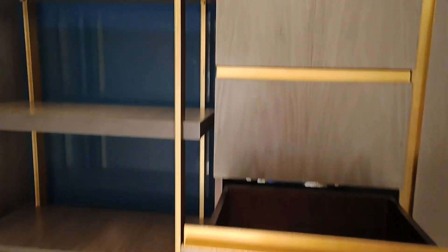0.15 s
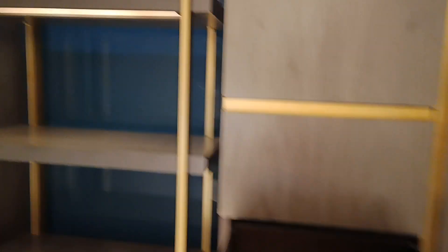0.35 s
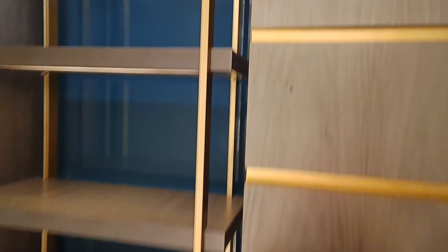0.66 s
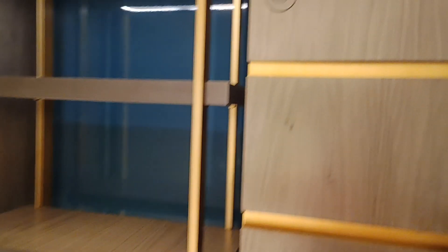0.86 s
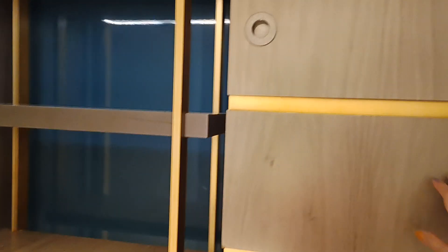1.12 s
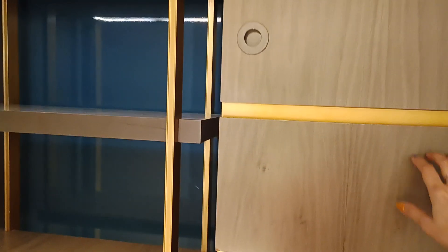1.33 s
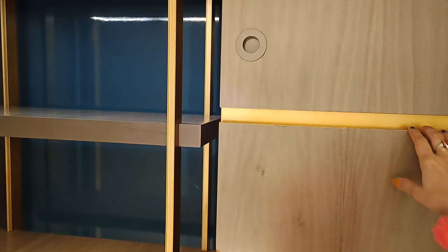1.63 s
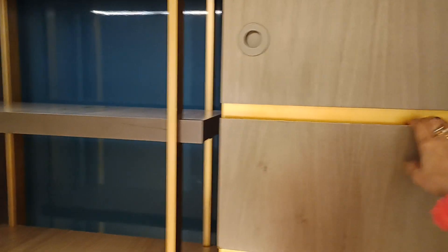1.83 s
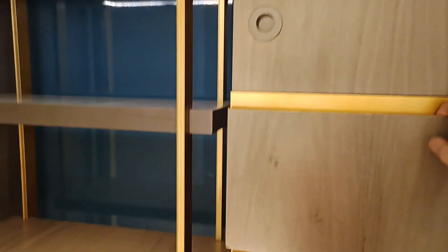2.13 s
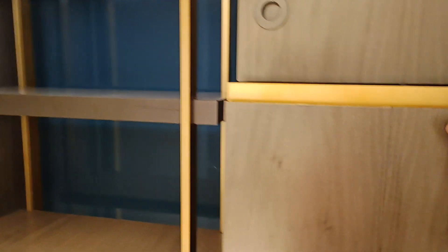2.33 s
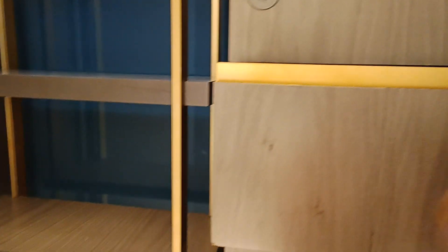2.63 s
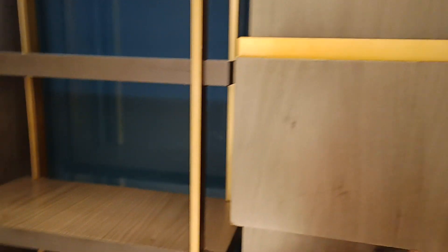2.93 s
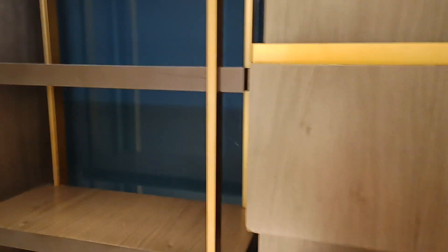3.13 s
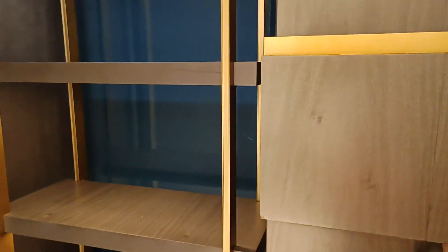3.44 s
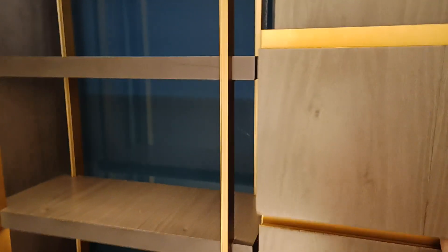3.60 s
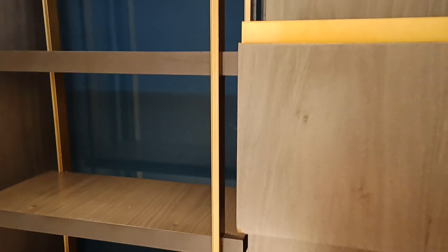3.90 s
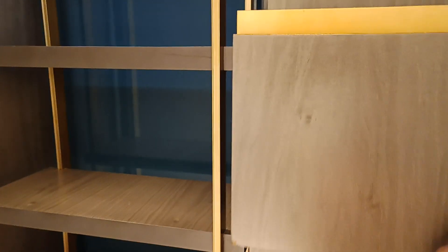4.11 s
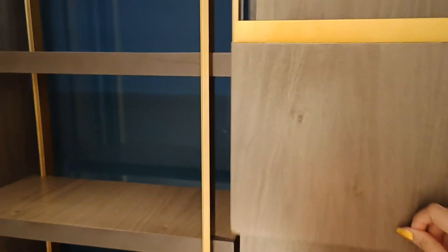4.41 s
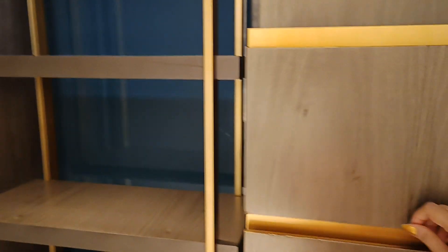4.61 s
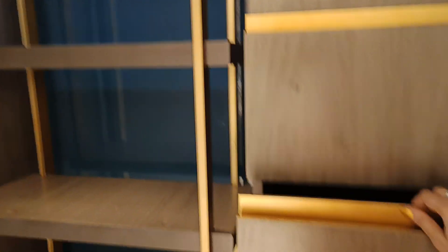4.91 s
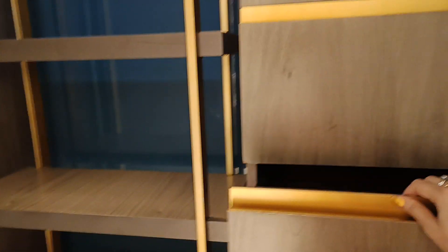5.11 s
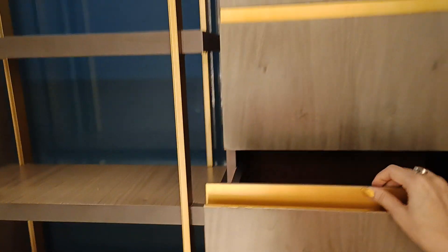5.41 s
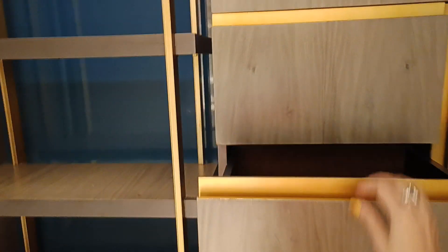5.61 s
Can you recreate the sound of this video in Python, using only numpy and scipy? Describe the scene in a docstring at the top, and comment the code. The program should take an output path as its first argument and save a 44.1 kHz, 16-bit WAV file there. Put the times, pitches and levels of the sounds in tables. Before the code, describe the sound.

Close stereo pickup in a small quiet room. After faint taps and rustle, a wooden drawer is shoved with a low buzzing judder. Light clicks follow, then a second drawer rumbles out, knocks softly and eases back until its metal catch snaps sharply. A third rolls out and hits its end stop with a deep, heavy wooden thud, leaving low rumble.

```python
"""Wooden drawers on metal runners in a small quiet room, heard from close by.
One is shoved shut with a judder; the next is pulled out and eased back until its catch snaps;
a third rolls out and thuds against its end stop. Knocks, soft low thumps, clicks and light taps are
decaying modes and noise bursts; drawer strokes, a soft rustle at the start and low rumble after the
stop are shaped noise; a slip train makes the judder. Diffuse echo and faint air lie around them."""
import sys
import numpy as np
from scipy import signal
from scipy.fft import rfft, irfft, next_fast_len
from scipy.io import wavfile

SR = 44100
rng = np.random.default_rng(int(sys.argv[2]) if len(sys.argv) > 2 else 0)


def to_wav(sig):
    """Store sig (one row per channel, or 1-D mono) as 16-bit WAV at the path in sys.argv[1].

    Samples outside -1..1 are clipped; the rate is SR.
    """
    pcm = np.clip(np.atleast_2d(sig), -1, 1) * 32767
    pcm = np.round(pcm).astype(np.int16)
    wavfile.write(sys.argv[1], SR, pcm.T)  # frames by channels


N = 253575
TIME = np.arange(N) / SR
AGE = TIME[:SR * 2 // 3]  # time since a blow [s]

# cabinet modes: (frequency [Hz], relative level [dB], t60 [s])
CABINET_MODES = [(59, 8.5, 0.35), (80.1, 6.5, 0.52), (110.8, 8, 0.22), (152.2, 8, 0.58), (171.2, 5, 0.41)]
# drawer box modes: (frequency [Hz], relative level [dB], t60 [s])
BOX_MODES = [(218.5, -5, 0.26), (248.4, -2, 0.31), (296.8, -6.5, 0.2), (331.5, 1, 0.24),
             (367.6, -6.5, 0.36), (404.4, 5.5, 0.036), (436.8, -19, 0.78)]
# thin side panels and drawer bottom: (frequency [Hz], relative level [dB], t60 [s])
PANEL_MODES = [(521, -4.5, 0.34), (604, -6, 0.74), (697.4, 3.5, 0.23), (768.5, 4.5, 0.18), (882, -2, 0.37),
               (1013, 4.5, 0.1), (1107, 3.5, 0.2), (1191, 9, 0.13), (1390, 4, 0.076), (1460, -9, 0.067),
               (1500, 3.5, 0.073), (1880, 16, 0.035)]
# steel runner modes: (frequency [Hz], relative level [dB], t60 [s])
RUNNER_MODES = [(1356, 6.5, 0.16), (1982, 13, 0.14), (1940, -17, 0.085), (2010, -28, 0.13),
                (2178, 8.5, 0.12), (2270, 26, 0.14), (2400, -27, 0.32), (2583, 5, 0.1), (2500, 5, 0.2),
                (2700, -7, .15), (3500, -2, 0.34), (3850, 5.5, 0.06)]
# dense cabinet boom: (frequency [Hz], relative level [dB/Hz])
BOOM_SPECTRUM = [(25, -48), (42, 0), (58, -29), (80, 7.5), (160, 0.5), (210, 5), (400, -61)]
# dense drawer box vibration: (frequency [Hz], relative level [dB/Hz])
BODY_SPECTRUM = [(120, -21), (220, -17.5), (350, 4.5), (440, 8), (540, -11.5), (900, -15), (2000, -70)]
# clack of edges and panels: (frequency [Hz], relative level [dB/Hz])
CLACK_SPECTRUM = [(300, -11), (550, -2), (720, -8), (950, -2.5), (1300, 0.5), (2100, -4), (3200, -14),
                  (7000, -32)]
# treble tick of a contact: (frequency [Hz], relative level [dB/Hz])
TICK_SPECTRUM = [(1200, -20), (2500, -3), (3800, 3), (5200, -2), (7000, -3.5), (10000, -13.5),
                 (16000, -12.5)]


def amp(db):
    """Decibels to gain."""
    return np.exp(np.asarray(db) * (np.log(10) / 20))


def read(points, hz):
    """Interpolates a spectrum table on a log-frequency axis."""
    table_hz, value = np.transpose(points)
    return np.interp(np.log(hz + 1), np.log(table_hz), value)


def add(mix, time_s, sound):
    """Mixes a sound in at time_s, cut at the end of the mix."""
    part = mix[:, round(time_s * SR):][:, :sound.shape[-1]]
    part += sound[..., :part.shape[1]]


def taps(points, size=8192):
    """Minimum-phase impulse response with the given spectrum."""
    hz = abs(np.fft.fftfreq(size, 1 / SR))
    log_gain = np.log(amp(read(points, hz)))
    spectrum = np.exp(np.conj(signal.hilbert(log_gain)))
    return np.fft.ifft(spectrum).real[:size // 2]


def colour(x, points):
    """Gives white sound a spectrum and keeps its power."""
    h = taps(points)
    return signal.oaconvolve(x, h[None] / np.linalg.norm(h), axes=1)[:, :N]


def blow(x):
    """Scales a struck sound to rms 1 over its first 40 ms."""
    return x / np.sqrt(np.mean(x[..., :SR // 25] ** 2) + 1e-20)


def grit(size, spread_db):
    """Two channels of noise whose shared strength changes every few milliseconds."""
    step = 128  # samples
    knots = rng.standard_normal(size // step + 2)
    level_db = spread_db * np.interp(np.arange(size) / step, np.arange(len(knots)), knots)
    strength = amp(level_db)
    return rng.standard_normal((2, size)) * strength / np.sqrt(np.mean(strength ** 2))


def onset(contact_s):
    """Force builds up over the contact time."""
    return 1 - np.exp(-(AGE / contact_s) ** 2)


def burst(contact_s, t60_s, chatter_db):
    """Countless close modes, as noise, that die away together with a little chatter."""
    return blow(grit(len(AGE), chatter_db) * onset(contact_s) * amp(-60 * AGE / t60_s))


def ring(modes, contact_s):
    """Decaying sines; each place of impact weights the modes a little differently."""
    place_db = rng.standard_normal(len(modes))
    total = np.zeros(len(AGE))
    for k, (hz, db, t60_s) in enumerate(modes):
        decay = amp(db + place_db[k] - 60 * AGE / t60_s)
        total += (-1) ** k * decay * np.sin(2 * np.pi * hz * AGE)
    return blow(total * onset(contact_s))


def shake(force, modes):
    """A running force keeps a set of modes ringing."""
    h = ring(modes, contact_s=0.0021)
    return signal.oaconvolve(force, h[None] / np.linalg.norm(h), axes=1)[:, :N]


def swell(start_s, rise_s, length_s, t60_s):
    """Envelope that builds up, holds until length_s after its start, and dies away."""
    age = np.maximum(TIME - start_s, 0)
    return (1 - np.exp(-(age / rise_s) ** 2)) * amp(-60 * np.maximum(age - length_s, 0) / t60_s)


def air(hiss_db=-55.5, drift_db=-2.0, throb_db=-60, throb_spread_db=3):
    """Faint drifting noise over a low throb: the lowest cabinet mode driven by noise."""
    # room air: (frequency [Hz], relative level [dB/Hz])
    air_spectrum = [(20, -5), (35, 2), (58, 2.5), (85, 6), (160, -4.5), (350, -5), (650, -9), (1400, -15),
                    (2600, -16.5), (6500, -25), (10000, -31.5), (16000, -25)]

    def wander(count):
        return np.interp(TIME, np.linspace(0, TIME[-1], count), rng.standard_normal(count))

    hiss_gain = amp(hiss_db + drift_db * wander(count=30))
    hiss = hiss_gain * colour(rng.standard_normal((2, N)), air_spectrum)
    throb_gain = amp(throb_db + throb_spread_db * wander(count=40))
    return hiss + throb_gain * shake(rng.standard_normal((2, N)), CABINET_MODES[:1])


def fitting_taps():
    """Light taps ring the modes of a small hard fitting."""
    # taps: (time [s], level [dB])
    tap_events = [(0.021, -66), (0.049, -54), (0.732, -59), (0.978, -65), (1.31, -67)]
    # fitting: (frequency [Hz], relative level [dB], t60 [s])
    fitting_modes = [(1485, -6.5, 0.055), (2410, -13, 0.04), (2580, 5.5, 0.019), (3490, 0, 0.018),
                     (4020, -10, 0.044)]
    mix = np.zeros((2, N))
    for time_s, db in tap_events:
        add(mix, time_s, amp(db) * ring(fitting_modes, contact_s=0.00029))
    return mix


def clicks(runner_db=-8.0, panels_db=-5, clack_dense_db=-3, snap=30.0, sharp_s=0.0012, lead_s=0.00042):
    """Steel snaps and rings runners and panels; crack and tones start first on the right."""
    # runner and catch metal, levels before the trims above:
    # (time [s], contact [s], clack [dB], ring [dB], tick [dB], noise t60 [s])
    click_events = [(.049, 0.0003, -80, -77, -62.5, 0.022), (0.978, 0.00036, -58.5, -59, -54.5, 0.069),
                    (0.994, 0.00032, -62, -83, -54.5, 0.039), (1.309, 0.0006, -61, -55, -82, 0.15),
                    (1.95, 0.0017, -50, -59, -54.5, 0.39), (1.972, 0.0017, -48.5, -48, -67, 0.12),
                    (2.319, 0.00033, -43.5, -51.5, -46, 0.14), (2.481, 0.00083, -57, -68, -56, 0.53),
                    (2.855, 0.00048, -62.5, -68, -57.5, 0.15), (3.494, 0.00083, -46.5, -49.5, -51.5, 0.17),
                    (3.6299, 0.00042, -31, -25.5, -35, 0.087), (3.6338, 0.00056, -32, -63, -47, 0.012),
                    (3.872, 0.0039, -46, -55.5, -77, 0.15), (3.921, 0.0015, -48.5, -65, -58, 0.11),
                    (4.028, 0.0013, -64, -60, -53.5, 0.19), (4.294, 0.0029, -64, -73, -55.5, 0.032),
                    (4.767, 0.0022, -46, -49, -52.5, 0.21), (4.835, 0.0006, -38, -43, -42, 0.11),
                    (4.939, 0.00055, -53, -52.5, -54, 0.041), (5.059, 0.0026, -50.5, -69, -54.5, 0.26),
                    (5.134, 0.0098, -50.5, -61, -58, 0.26), (5.554, 0.0014, -55, -64, -57.5, 0.48)]
    # dense steel ring: (frequency [Hz], relative level [dB/Hz])
    steel_spectrum = [(900, -20), (1600, -4), (2050, 1.5), (2500, -2), (3000, -8), (3600, -12.5),
                      (7000, -37)]
    modes, clack, steel, tick = np.zeros((4, 2, N))
    lag = round(lead_s * SR)
    for time_s, contact_s, clack_db, ring_db, tick_db, t60_s in click_events:
        strike = burst(contact_s, t60_s, chatter_db=3.0)
        rattle = burst(contact_s, t60_s, chatter_db=2.5)
        crack = np.zeros_like(strike)
        crack[[0, 1], [lag, 0]] = snap * np.exp(-contact_s / sharp_s)  # weak for a soft contact
        add(clack, time_s, amp(clack_db + clack_dense_db) * burst(contact_s, t60_s, chatter_db=9))
        add(steel, time_s, amp(ring_db) * blow(strike + crack))
        add(tick, time_s, amp(tick_db) * blow(rattle + crack))
        runner_tone = amp(ring_db + runner_db) * ring(RUNNER_MODES, contact_s)
        panel_tone = amp(clack_db + panels_db) * ring(PANEL_MODES, contact_s)
        tone = runner_tone + panel_tone
        add(modes, time_s, np.array([np.roll(tone, lag), tone]))
    dense = colour(clack, CLACK_SPECTRUM) + colour(steel, steel_spectrum)
    return modes + dense + colour(tick, TICK_SPECTRUM)


def nails():
    """Tiny hard contacts, as of fingernails: noise bursts mostly in the high treble."""
    # ticks: (time [s], level [dB], t60 [s])
    nail_events = [(0.049, -59, 0.0078), (0.925, -67, 0.028), (0.942, -65, 0.036), (0.976, -60, .03),
                   (.993, -56, 0.1), (1.069, -62, 0.083), (1.105, -65, 0.046), (1.309, -62, .2),
                   (3.25, -58, 0.11), (4.180, -69, 0.022), (4.294, -54, 0.12)]
    # bright tick: (frequency [Hz], relative level [dB/Hz])
    bright_spectrum = [(3000, -27), (6000, -12), (7500, 5.5), (9500, -3.5), (12000, 3), (16000, -4)]
    ticks = np.zeros((2, N))
    for time_s, db, t60_s in nail_events:
        add(ticks, time_s, amp(db) * burst(contact_s=0.00041, t60_s=t60_s, chatter_db=5))
    return colour(ticks, bright_spectrum)


def strokes_and_rustle(cabinet_db=-12, box_db=-10, panels_db=-19, rise_s=0.03, fade_t60_s=0.6):
    """Drawer strokes, a soft rustle at the start, low rumble after the stop: noise and driven modes."""
    # drawer strokes, first rustle, last rumble: (start [s], length [s], rumble [dB], scrape [dB])
    stroke_events = [(0.061, 0.062, -53, -52), (0.33, 0.53, -51.5, -60.5), (1.144, 0.66, -59, -57.5),
                     (1.977, 0.064, -36, -52), (2.226, 0.21, -46, -60), (2.378, 0.1, -39.5, -49.5),
                     (3.227, 0.073, -44.5, -52), (3.443, 0.2, -43, -55.5), (3.603, 0.25, -40, -57.5),
                     (3.979, 0.21, -47, -59.5), (4.204, 0.063, -41, -54), (4.468, 0.56, -43.5, -60.5),
                     (5.074, 0.22, -38.5, -62.5)]
    # low rumble: (frequency [Hz], relative level [dB/Hz])
    rumble_spectrum = [(25, -38.5), (45, -7), (58, 13.5), (80, -1.5), (150, -7), (240, -4), (340, -4),
                       (480, -10), (800, -17), (1500, -16), (4000, -68)]
    # bright scrape or rustle: (frequency [Hz], relative level [dB/Hz])
    scrape_spectrum = [(300, -20), (900, -5.5), (1500, -1), (2200, -2), (3300, -4.5), (6500, -8.5),
                       (10000, -20), (16000, -48.5)]
    rumble, scrape = np.zeros((2, N))
    for start_s, length_s, rumble_db, scrape_db in stroke_events:
        envelope = swell(start_s, rise_s, length_s, fade_t60_s)
        rumble = np.hypot(rumble, amp(rumble_db) * envelope)  # powers add
        scrape = np.hypot(scrape, amp(scrape_db) * envelope)
    drive = rumble * grit(N, spread_db=7)
    driven = amp(cabinet_db) * shake(drive, CABINET_MODES)
    driven += amp(box_db) * shake(drive, BOX_MODES)
    driven += amp(panels_db) * shake(drive, PANEL_MODES)
    rumble_noise = colour(rumble * grit(N, spread_db=4.0), rumble_spectrum)
    scrape_noise = colour(scrape * grit(N, spread_db=2.0), scrape_spectrum)
    return driven + rumble_noise + scrape_noise


def knocks_and_thumps(low_modes_db=-3, box_modes_db=-4, panels_db=-6, boom_dense_db=-13,
                      body_dense_db=-13, clack_dense_db=-1):
    """Knocks of wood and a few soft low thumps: decaying modes and noise bursts, balanced per event."""
    # knocks and thumps, levels before the trims above:
    # (time [s], contact [s], boom [dB], body [dB], clack [dB], tick [dB])
    knock_events = [(0.441, 0.0051, -67, -55, -46.5, -53), (1.083, 0.015, -45, -46.5, -54, -57.5),
                    (2.003, 0.0019, -39.5, -42, -38, -47), (2.015, 0.00071, -41, -48, -55, -44.5),
                    (2.048, .006, -37.5, -68, -47, -54), (2.124, 0.0036, -39, -67, -60, -69),
                    (2.206, 0.0066, -43.5, -45, -54, -64), (2.389, 0.0099, -49, -46.5, -48, -72),
                    (2.415, 0.0016, -44, -47, -55, -48), (3.232, 0.00087, -44, -46.5, -53, -63),
                    (3.248, 0.0049, -32.5, -41.5, -41, -45), (3.511, 0.004, -43, -61, -64, -70),
                    (3.576, 0.0013, -40, -53, -46, -60), (3.802, 0.0041, -38.5, -51, -47.5, -57.5),
                    (4.274, 0.00067, -50, -51, -45, -55.5), (5.1639, 0.0011, -22.5, -25.5, -32.5, -65),
                    (5.171, 0.00051, -20, -15.5, -44, -53), (5.193, 0.0026, -30, -27, -42.5, -52),
                    (5.214, .004, -23, -58, -56, -80), (5.257, 0.0032, -32, -32, -66, -76),
                    (5.595, 0.0079, -46.5, -58.5, -74, -74)]
    modes, boom, body, clack, tick = np.zeros((5, 2, N))
    for time_s, contact_s, boom_db, body_db, clack_db, tick_db in knock_events:
        add(modes, time_s, amp(boom_db + low_modes_db) * ring(CABINET_MODES, contact_s))
        add(modes, time_s, amp(body_db + box_modes_db) * ring(BOX_MODES, contact_s))
        add(modes, time_s, amp(clack_db + panels_db) * ring(PANEL_MODES, contact_s))
        add(boom, time_s, amp(boom_db + boom_dense_db) * burst(contact_s, t60_s=0.33, chatter_db=2.5))
        add(body, time_s, amp(body_db + body_dense_db) * burst(contact_s, t60_s=0.11, chatter_db=4.5))
        add(clack, time_s, amp(clack_db + clack_dense_db) * burst(contact_s, t60_s=0.23, chatter_db=2))
        add(tick, time_s, amp(tick_db) * burst(contact_s, t60_s=0.2, chatter_db=4.0))
    low = colour(boom, BOOM_SPECTRUM) + colour(body, BODY_SPECTRUM)
    return modes + low + colour(clack, CLACK_SPECTRUM) + colour(tick, TICK_SPECTRUM)


def shove(box_db=-11, panels_db=-17, runner_db=-28, slips_db=-5, rub_db=-3, sway_db=-4,
          sway_dense_db=-14, jitter_s=0.0001):
    """A hard-pushed drawer sticks and slips in an even train that buzzes wood and sways the cabinet."""
    # rubbing of the shoved drawer: (frequency [Hz], relative level [dB/Hz])
    rub_spectrum = [(70, -29), (110, -3), (190, -6.5), (260, -0.5), (300, 1), (345, -1), (430, -0.5),
                    (620, -7), (900, -10), (1250, -12), (1650, -18.5), (2100, -15.5), (2700, -23.5),
                    (11000, -49)]
    start_s, judder_hz = 0.4588, 58.9
    rumble = amp(-23) * swell(start_s, rise_s=0.053, length_s=0.095, t60_s=0.47)
    boom = amp(-26) * swell(start_s, rise_s=0.033, length_s=0.17, t60_s=0.24)

    slip_s = np.arange(0, TIME[-1] - 0.1, 1 / judder_hz)
    late, size_db = rng.standard_normal((len(slip_s), 2)).T
    slip_index = np.round(abs(slip_s + jitter_s * late) * SR).astype(int)
    slips = np.zeros(N)
    slips[slip_index] = amp(2 * size_db) * np.sqrt(SR / judder_hz)  # near unit rms

    rub = amp(rub_db) * rumble * grit(N, spread_db=0.0)
    jolts = rumble * slips + rub
    modes = amp(box_db) * shake(jolts, BOX_MODES)
    modes += amp(panels_db) * shake(jolts, PANEL_MODES)
    modes += amp(runner_db) * shake(jolts, RUNNER_MODES)
    buzz = colour((rumble * slips)[None], BODY_SPECTRUM)  # the slips drum on the box
    dense = amp(slips_db) * buzz + colour(rub, rub_spectrum)
    sway = amp(sway_db) * boom * np.sin(2 * np.pi * judder_hz * TIME)
    sway_dense = amp(sway_dense_db) * colour(boom * grit(N, spread_db=3), BOOM_SPECTRUM)
    return modes + dense + sway + sway_dense


def board_bumps():
    """The bottom board of the second drawer drums as the rollers cross a bump."""
    # bumps: (time [s], level [dB])
    bump_events = [(2.414, -39.5), (2.484, -42.5)]
    # bottom board: (frequency [Hz], relative level [dB], t60 [s])
    board_modes = [(221.8, 6, 0.28), (276, -15, 0.22), (424, -3.5, 0.17)]
    mix = np.zeros((2, N))
    for time_s, db in bump_events:
        add(mix, time_s, amp(db) * ring(board_modes, contact_s=0.0087))
    return mix


def settles():
    """The drawer front rings softly as it settles on its bumpers."""
    # settling: (time [s], level [dB])
    settle_events = [(4.275, -37.5), (4.292, -40)]
    # drawer front: (frequency [Hz], relative level [dB], t60 [s])
    front_modes = [(613.6, 7, 0.25), (682, 2.5, 0.15), (769, 8.5, 0.066), (899, -15, 0.13)]
    mix = np.zeros((2, N))
    for time_s, db in settle_events:
        add(mix, time_s, amp(db) * ring(front_modes, contact_s=0.012))
    return mix


def room(x, build_s=0.0019):
    """A diffuse noise tail in which each band dies at its own speed."""
    # room decay: (frequency [Hz], t60 [s])
    room_decay = [(60, 0.43), (300, 0.75), (700, 0.58), (2000, 0.49), (6000, 0.47), (14000, 0.29)]
    hz, t, z = signal.stft(rng.standard_normal((2, len(AGE))), SR, nperseg=256)
    decay = amp(-60 * t / read(room_decay, hz)[:, None])
    tail = signal.istft(z * decay, SR)[1][:, :len(AGE)] * onset(build_s)
    return signal.oaconvolve(x, tail / np.linalg.norm(tail[0]), axes=1)[:, :N]


def ports(x):
    """Mid and side are weighted by band: long waves reach both ports alike, short ones differ."""
    # likeness of diffuse sound at the two ports: (frequency [Hz], correlation [-1..1])
    likeness = [(60, 1), (130, 0.76), (290, 0.95), (640, 0.36), (1400, -0.18), (3000, 0)]
    size = next_fast_len(N)
    same = np.clip(read(likeness, np.fft.rfftfreq(size, 1 / SR)), -1, 1)
    mid, side = rfft([x[0] + x[1], x[0] - x[1]], size) / 2
    mid, side = mid * np.sqrt(1 + same), side * np.sqrt(1 - same)
    return irfft([mid + side, mid - side], size)[:, :N]


def scene(knock_wet_db=-11, click_wet_db=-5, stroke_wet_db=-10):
    """The drawers and small handling sounds, their echo, and the air of the room."""
    low = knocks_and_thumps() + settles() + board_bumps()
    metal = clicks() + fitting_taps()
    strokes = strokes_and_rustle() + shove()
    echo = room(amp(knock_wet_db) * low + amp(click_wet_db) * metal + amp(stroke_wet_db) * strokes)
    return ports(low + metal + strokes + nails() + echo + air())


def record(dry):
    """Each microphone port colours the treble in its own way; a low-pass limits the band."""
    # left port response: (frequency [Hz], gain [dB])
    left_response = [(4000, -0.5), (5500, -3), (7200, -7), (8000, 5), (9000, 1), (12000, 1), (16000, -15)]
    # right port response: (frequency [Hz], gain [dB])
    right_response = [(4000, -0.5), (5500, 1.5), (6700, 10), (7500, 2), (8300, -62), (8900, -5),
                      (9400, -10.5), (13000, -4.5), (15500, -5)]
    edge_hz = 16100
    responses = np.array([taps(left_response), taps(right_response)])
    heard = signal.oaconvolve(dry, responses, axes=1)[:, :N]
    low_pass = signal.firwin(511, edge_hz, window=("kaiser", 9), fs=SR)
    return signal.oaconvolve(heard, low_pass[None], "same", axes=1)


dry = scene()
out = record(dry)
to_wav(out)
```